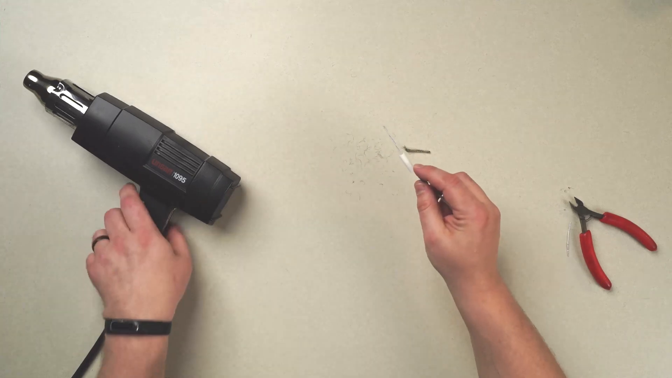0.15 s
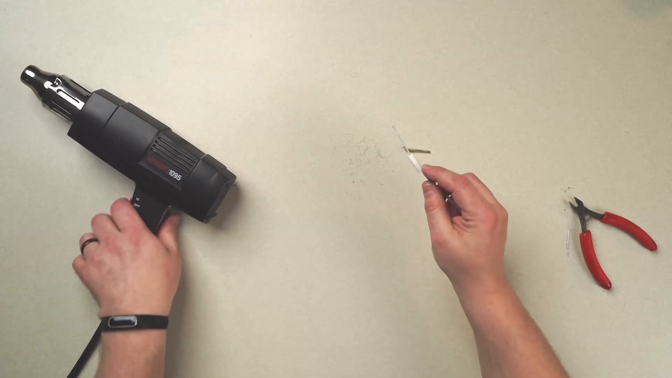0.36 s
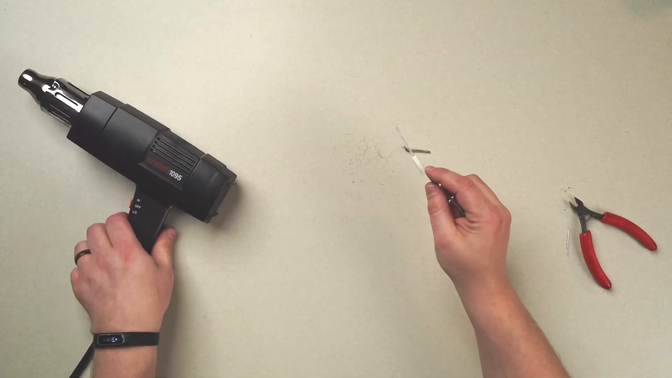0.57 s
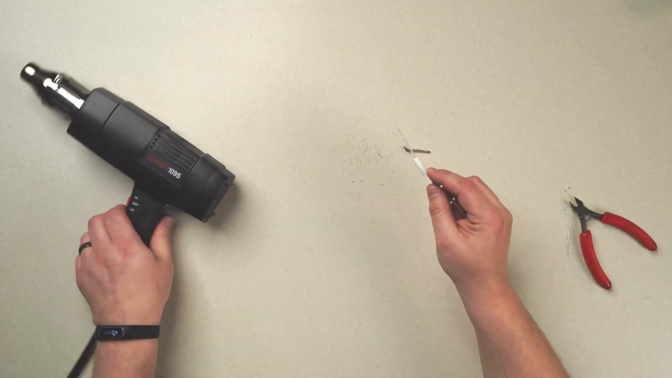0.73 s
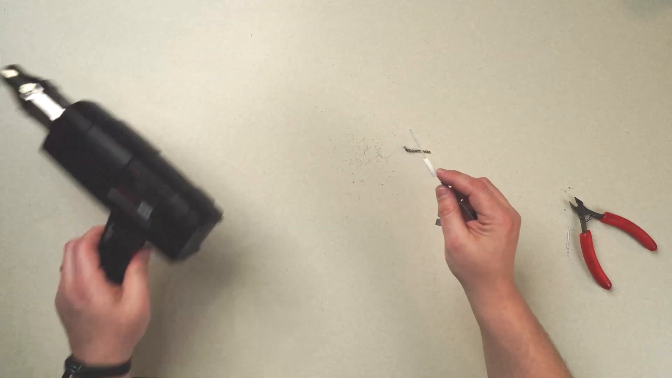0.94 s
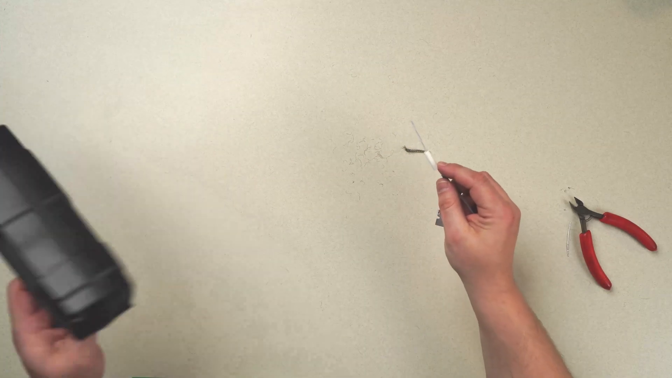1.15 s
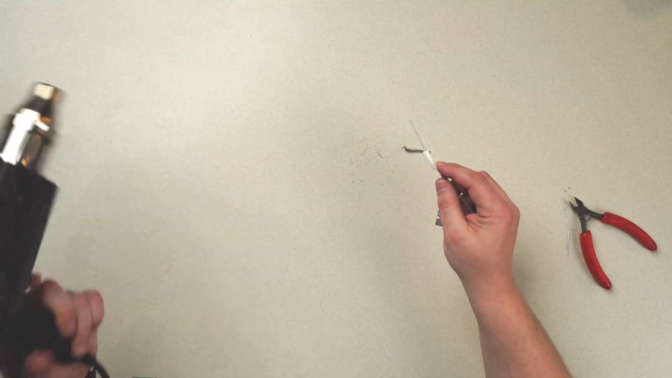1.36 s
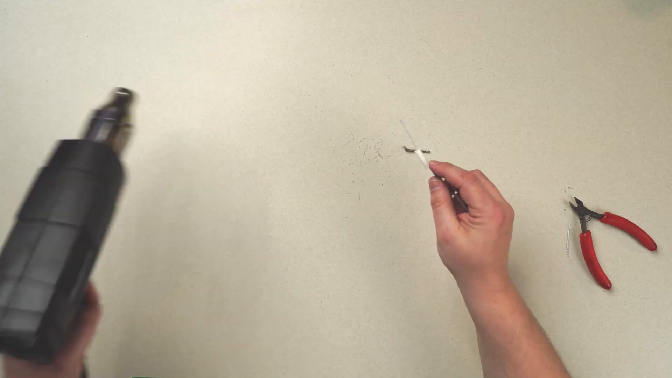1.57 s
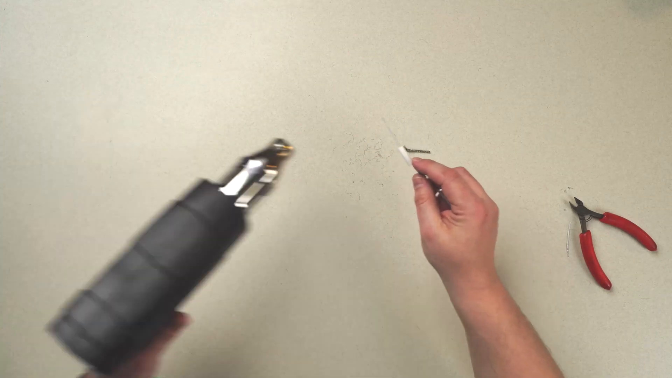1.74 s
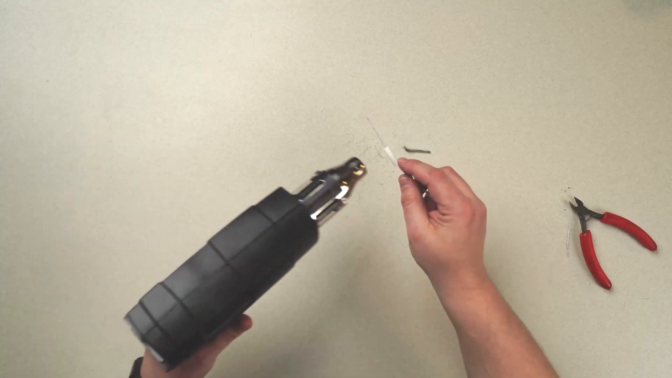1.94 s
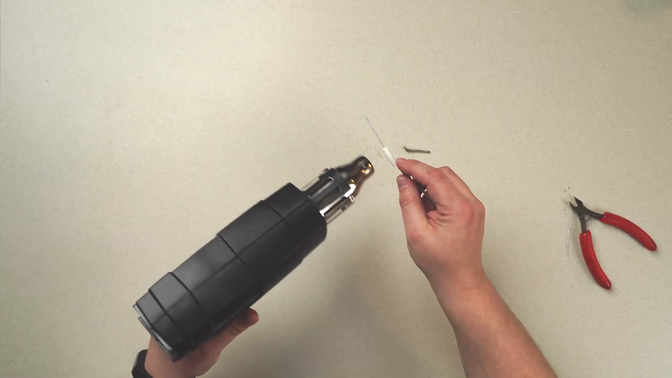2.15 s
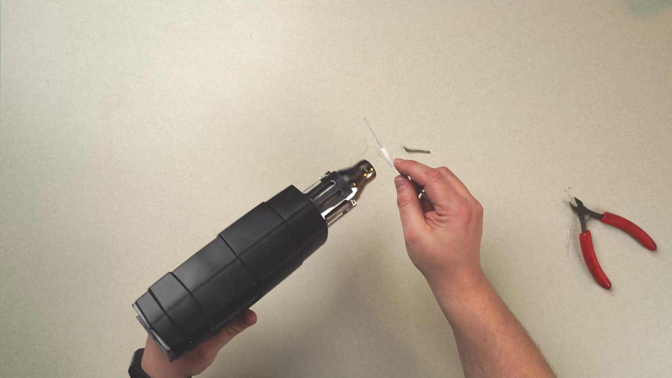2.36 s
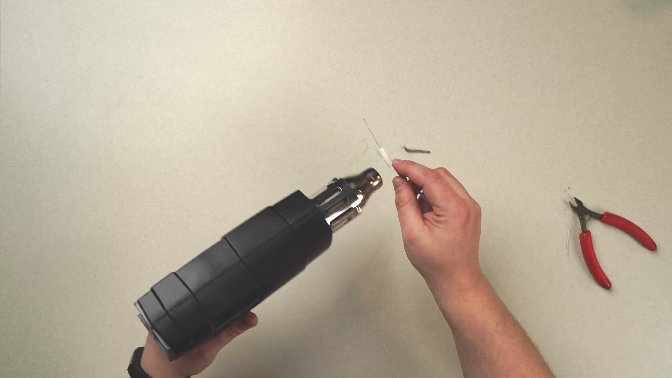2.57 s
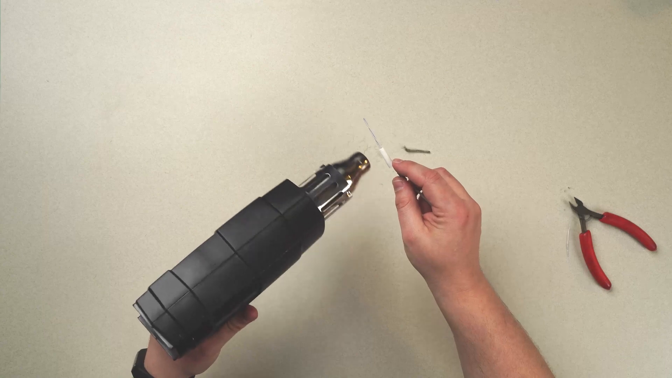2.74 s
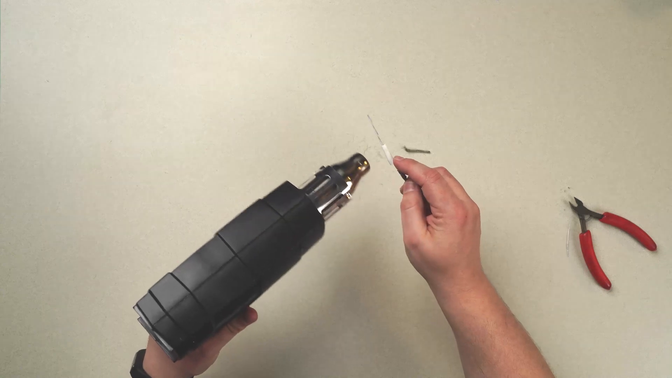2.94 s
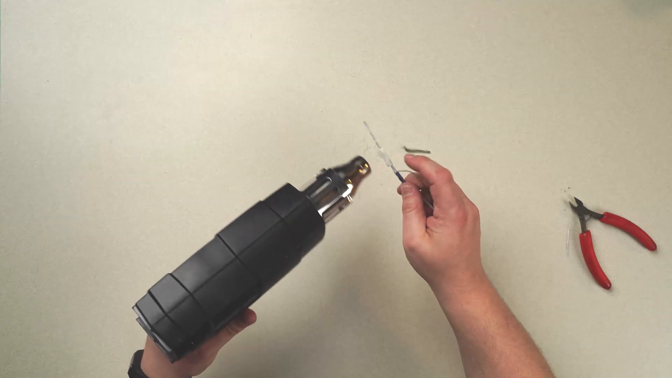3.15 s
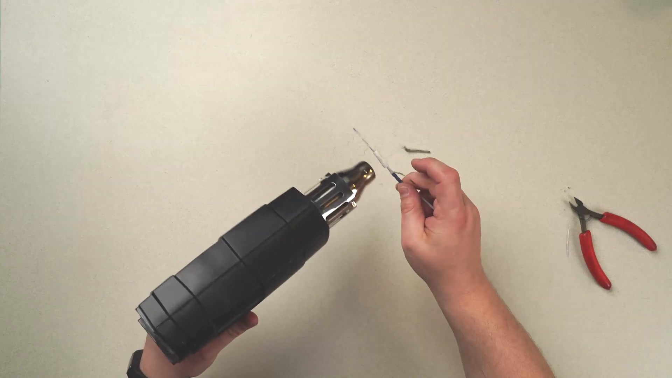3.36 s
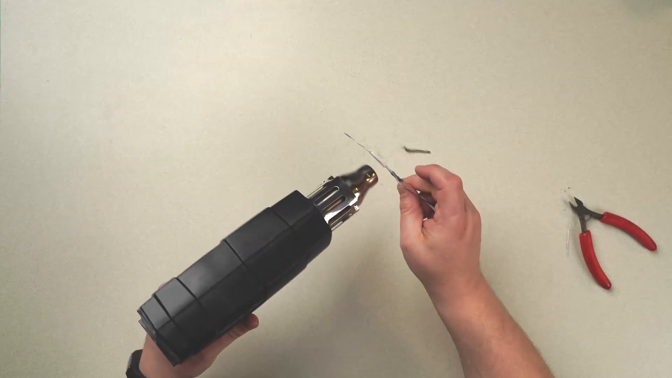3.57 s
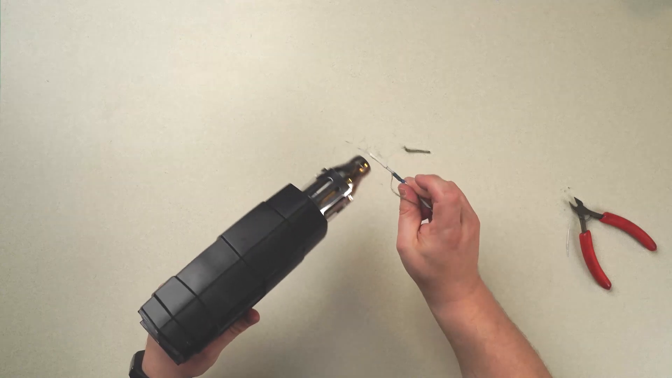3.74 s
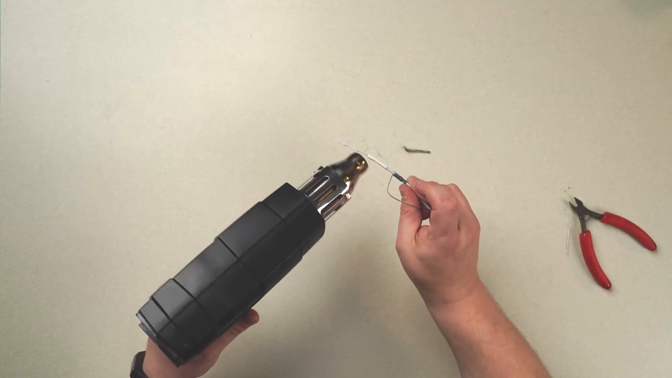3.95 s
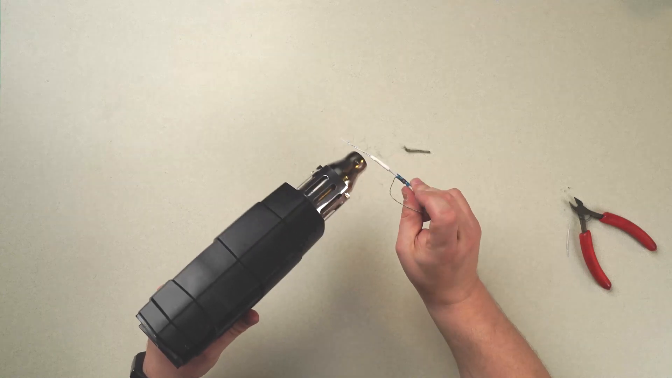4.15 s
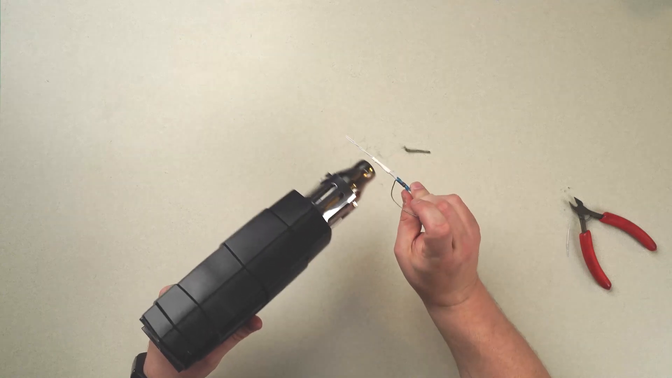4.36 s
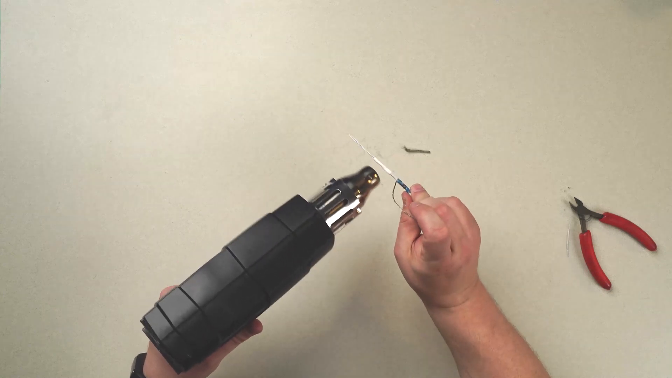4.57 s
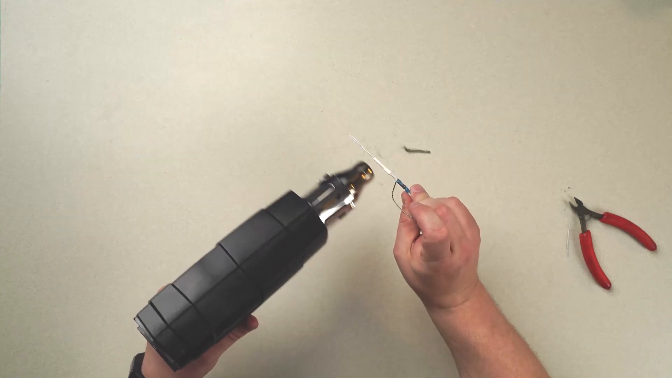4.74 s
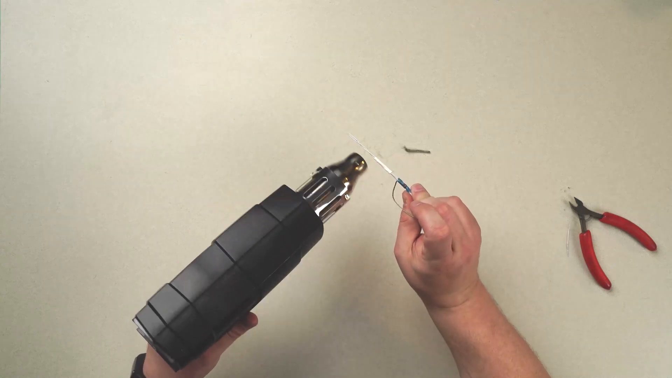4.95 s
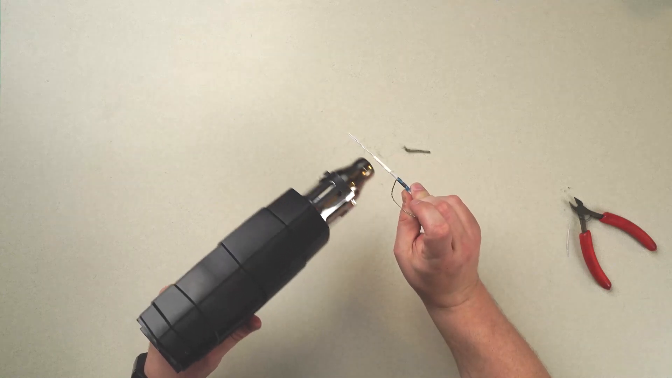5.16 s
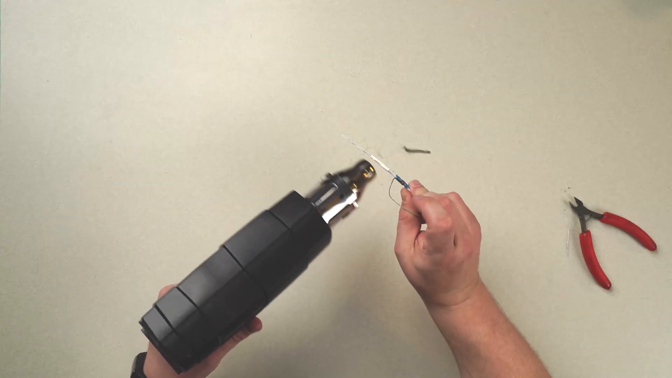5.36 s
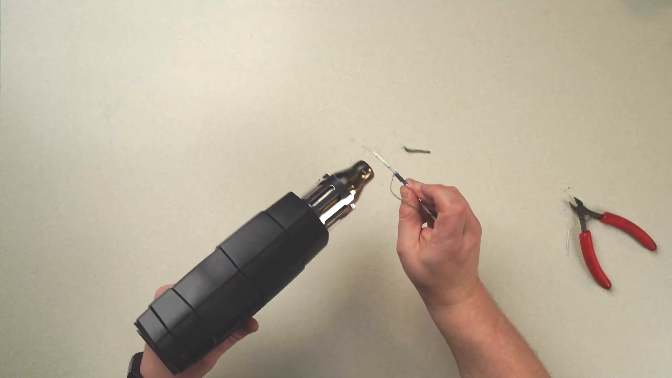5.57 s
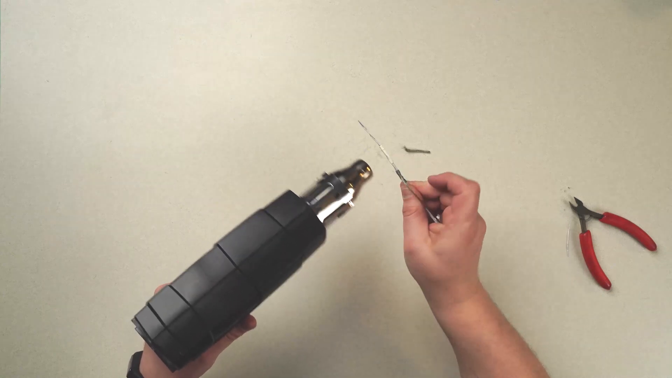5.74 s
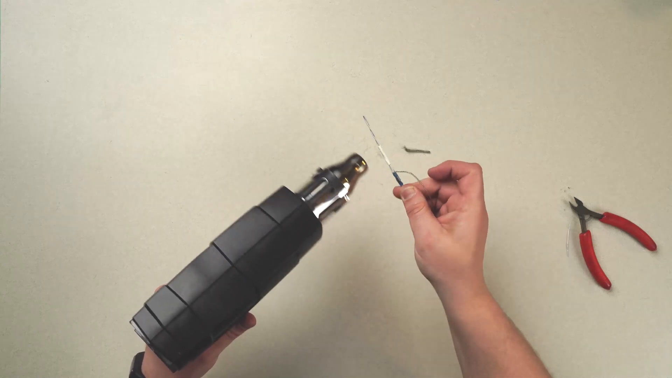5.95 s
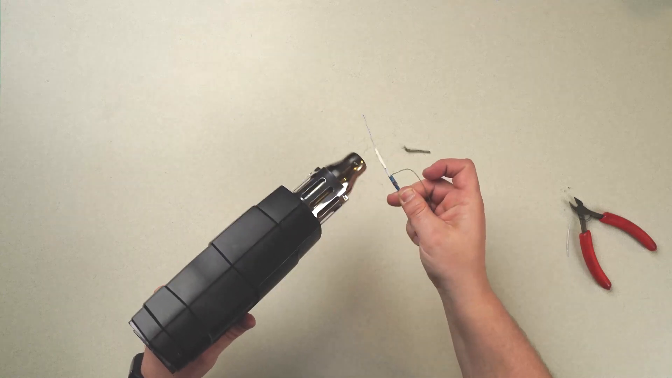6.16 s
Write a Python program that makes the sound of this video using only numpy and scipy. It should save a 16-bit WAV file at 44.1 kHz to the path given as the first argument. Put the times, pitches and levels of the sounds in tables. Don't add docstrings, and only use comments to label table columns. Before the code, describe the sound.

A heat gun is handled with plastic ticks and soft bench bumps, its switch snaps, and the motor climbs to a steady whine with rushing air.

```python
import sys
import numpy as np
from scipy import signal
from scipy.fft import rfft, irfft
from scipy.io import wavfile
from scipy.ndimage import uniform_filter1d, map_coordinates

SR = 44100
rng = np.random.default_rng(int(sys.argv[2]) if len(sys.argv) > 2 else 0)


def unload_wav(signal):
    wavfile.write(
        sys.argv[1],
        SR,
        np.round(np.clip(np.atleast_2d(signal).T, -1, 1) * 32767).astype(np.int16),
    )


def makeup_ratio(level_db):
    decades = np.asarray(level_db, float) / 20
    return 10 ** decades


N = 273861
TIME = np.arange(N) / SR
HZ = np.arange(N // 2 + 1) * SR / N + 1e-3

# f/Hz, level/dB per Hz
ROOM_NOISE = [(26, -32), (45, -12), (108, 5.5), (171, 4), (355, -0.5), (873, -14), (1320, -15), (1770, -23),
              (7060, -29), (12700, -25), (15000, -42)]
# middle t/s, length t/s, level/dB
PUFFS = [
    (.02, .25, -76),
    (1.6, .09, -61),
    (1.74, .16, -57),
    (1.92, .07, -54),
    (2.17, .22, -62),
    (2.8, .5, -70),
]
# t/s, shell ring level/dB, struck part level/dB, struck part f/Hz, bright crack level/dB
GRIP_TICKS = [(.005, -84, -67, 13500, -78), (.151, -64, -64, 3600, -65), (.157, -61, -65, 4000, -62),
              (.216, -60, -67, 3000, -73), (.233, -67, -68, 4000, -79), (0.353, -52, -55, 1500, -75),
              (.357, -48, -46, 600, -62), (.361, -47, -49.5, 4160, -70), (.5, -53, -75, 2500, -84),
              (.521, -53, -70, 3300, -86), (0.676, -85, -54, 2450, -95)]
LIFT_TICKS = [(.758, -45, -41.5, 2020, -38), (.76, -38, -33, 3980, -54), (0.845, -38.5, -55, 4500, -58),
              (.848, -48, -56, 4500, -55), (0.858, -55, -55, 3600, -55), (.869, -38, -40, 5400, -46),
              (.872, -55, -46, 3500, -55), (0.878, -45, -43, 4600, -56), (.906, -66, -70, 5500, -65),
              (.944, -57, -62, 3000, -68), (1.051, -74, -63, 3800, -63), (1.059, -69, -59, 3850, -55)]
SWITCH_TICKS = [
    (1.123, -62, -55, 2900, -64),
    (1.127, -49, -46, 2900, -55),
    (1.131, -60, -44, 4770, -51),
    (1.132, -70, -42, 13000, -70),
    (1.142, -38, -34, 3540, -46),
    (1.145, -46, -46, 3000, -59),
    (1.151, -41, -40.5, 950, -64),
    (1.233, -45, -68, 3000, -80),
]
TICK_T60_S = (0.018, 0.019, 0.026)
# f/Hz, width f/Hz, level/dB
TICK_RINGS = [
    [(646, 120, 1), (940, 210, -13), (1100, 380, 16), (1600, 150, -4)],
    [(6430, 930, 3), (8000, 1400, -1), (10300, 2500, 5), (13000, 1700, -7)],
]
# middle t/s, length t/s, level/dB, bright rub against it level/dB
STROKES = [
    (.12, .05, -74, -8),
    (.18, 0.061, -84, 6),
    (0.242, 0.055, -65, -26),
    (0.353, 0.064, -59.5, -13),
    (.42, 0.12, -64, -14),
    (0.585, .1, -58.5, -15.5),
    (0.804, 0.065, -59.5, -12),
    (0.89, 0.14, -66, -3),
    (1.023, 0.16, -70, -5),
    (1.2, .14, -67, 0),
]
# t/s, peak level/dB, f/Hz,
# time to fall 60 dB t/s
BUMPS = [(.22, -65, 170, 0.036), (.312, -51.5, 190, .05), (0.323, -50, 190, 0.04), (0.494, -42, 157, 0.031),
         (0.521, -49, 152, 0.064), (.564, -40.5, 157, 0.033), (.6, -54, 170, .05), (.62, -46, 170, 0.037),
         (0.687, -52, 130, 0.044), (0.789, -49, 145, 0.064), (.803, -56, 145, 0.065),
         (0.837, -53, 150, 0.044), (1.54, -57, 105, 0.18), (1.6, -59, 125, .1)]
# full-speed level/dB, power of speed, turned-away level/dB, drift level/dB per s
FLOW = [
    (-34, 1.53, -3.5, .15),
    (-38, 2.3, -3, -.3),
    (-36, 3.36, -4.5, -0.03),
]
# f/Hz, level/dB per Hz
AIR_COLOUR = [(90, -36.5), (200, -14.5), (330, -8), (520, -1), (900, -2.5), (1500, -7), (1950, -16),
              (3000, -8), (5300, -18), (7500, -13), (9800, -18.5), (12000, -17.5), (14500, -18)]
# f/Hz, level/dB per Hz
AWAY_COLOUR = [(90, -25), (330, -9.5), (900, 0), (1900, -14), (2800, -5), (4500, -13), (7000, -7),
               (7900, -22), (9000, -15), (11500, -13), (12300, -16), (14000, -18), (15000, -36)]
# f/Hz, width f/Hz, level/dB per Hz
BARREL = [(513, 140, -3), (696, 35, -1.5), (968, 74, 1), (1125, 43, 2.5), (1530, 100, -8.5),
          (2633, 290, -4.5), (2741, 36, 0), (3270, 170, -7.5), (4243, 205, -5), (4736, 170, -7),
          (5110, 60, -8.5), (5790, 250, -6.5), (6000, 220, -4.5), (6810, 120, -10), (7220, 100, -17),
          (8130, 190, -11), (8900, 120, -12), (9030, 420, -16), (10460, 170, -12.5), (11430, 300, -10),
          (12160, 340, -17), (13030, 310, -9.5)]
# multiple of the shaft speed, level/dB
BUZZ = [(2, 2), (3, -6), (4, -1.5), (5, -6.5), (6, -12), (7, -9), (8, -2), (9, -11), (10, -13), (11, -31),
        (16, -10)]
# multiple of the shaft speed, level/dB
RIPPLE = [(2, -4.5), (3, -2), (4, -0.5), (5, 1.7), (6, -3), (7, -9), (8, -5), (9, -7), (10, -19), (11, -8),
          (12, -17), (13, -14), (14, -16), (15, -19), (16, -14), (17, -15), (18, -17), (19, -16), (20, -14),
          (22, -14)]
# shaft f/Hz, width f/Hz, gain level/dB
WOBBLE = [(160, 18, 4.5), (179, 12, 3), (193, 14, 10), (252, 22, 4.5), (272, 16, 3), (318, 29, 2),
          (333, 20, -2), (376, 41, 1.5)]
# f/Hz, width f/Hz, level/dB
GRIP = [(194, 27, -55.5), (284, 18, -47), (340, 21, -43)]
# f/Hz, width f/Hz, turned-away level/dB, aimed level/dB
SHELL = [(724, 73, -18, 5), (855, 31, 3, -18), (950, 67, -1, 4), (1109, 47, 4.5, 5), (1234, 93, -1, -30),
         (1332, 63, 2.5, -7), (1500, 33, -27, 3.5), (1590, 57, -20, -1), (1720, 60, -3, -21),
         (1840, 100, -15, -3.5)]
SLOTS = [(2200, 100, -4, -12), (2450, 110, -3, -8), (2650, 90, -1.5, -2.5), (2800, 90, 4, -3),
         (2980, 90, 3, -6), (3180, 80, -5, -7), (3450, 90, -1.5, -8), (3780, 110, -2.5, -8)]
# shaft f/Hz, width f/Hz, low rattle level/dB, bright rattle level/dB
SHAKE = [(92, 34, -58, -84), (139, 48, -56, -67), (161, 12, -54, -76), (202, 17, -43, -51),
         (204, 20, -46, -66), (280, 22, -50, -67), (308, 21, -41.5, -72), (345, 42, -55, -80)]

SWITCH_S = 1.132
FULL_HZ = 429.07


def slope(points):
    hz, db = np.transpose(points)
    return makeup_ratio(np.interp(np.log(HZ), np.log(hz), db)) ** 2


def peaks(modes, hz):
    return sum(makeup_ratio(db) ** 2 / (1 + (1.41 * (hz - f) / w) ** 2) ** 2 for f, w, db in modes)


def band(lo_hz, hi_hz):
    return 1 / (1 + (lo_hz / HZ) ** 8) / (1 + (HZ / hi_hz) ** 8)


def noise(power):
    hiss = irfft(rfft(rng.standard_normal(N)) * np.sqrt(power), N)
    return hiss / np.sqrt(np.mean(hiss ** 2))


def walk(rate):
    k = int(SR / rate)
    held = np.repeat(rng.standard_normal(N // k + 1), k)
    return 1.26 * uniform_filter1d(uniform_filter1d(held, k), k)[:N]


def swells(rows, rest_db):
    power = makeup_ratio(rest_db) ** 2
    for s, length, db in rows:
        power = power + makeup_ratio(db) ** 2 * np.exp(-(2.56 * (TIME - s) / length) ** 2)
    return np.sqrt(power)


def ring(modes, t):
    out = 0
    for f, w, db in modes:
        swell_and_fade = w * t * np.exp(-1.8 * np.pi * w * t)
        out = out + makeup_ratio(db) * np.sqrt(w) * swell_and_fade * np.sin(2 * np.pi * f * t)
    return out / np.sqrt(np.sum(out ** 2))


def room():
    floor = makeup_ratio(-67 + 2.7 * walk(3.3)) * noise(slope(ROOM_NOISE) * band(40, 12500))
    hum = makeup_ratio(-70 + 3.3 * walk(2.9)) * np.sin(2 * np.pi * 59 * TIME)
    draught = swells(PUFFS, -73.5) * makeup_ratio(4.3 * walk(11)) * noise(band(8.8, 43))
    return floor + hum + draught


def ticks():
    out, t = np.zeros(N), TIME[:SR // 8]
    shell, crack = (ring(modes, t) for modes in TICK_RINGS)
    for rows, t60 in zip((GRIP_TICKS, LIFT_TICKS, SWITCH_TICKS), TICK_T60_S):
        fade = makeup_ratio(-60 * t / t60)
        for s, shell_db, part_db, hz, crack_db in rows:
            part = ring([(hz, 640, 0), (.82 * hz, 500, -11), (1.33 * hz, 900, -13)], t)
            i = int(s * SR)
            for db, rings in ((shell_db, shell), (part_db, part), (crack_db, crack)):
                burst = (rng.standard_normal(len(t)) + 3 * (t == 0)) * fade
                out[i:i + len(t)] += makeup_ratio(db) * signal.fftconvolve(burst, rings)[:len(t)]
    return signal.sosfilt(signal.butter(4, 450, "high", fs=SR, output="sos"), out)


def echo(hits):
    t60_s, level_db = 0.13, -14.5
    t = TIME[:SR // 3]
    tail = noise(slope([(200, -10), (1000, 1.5), (5000, -7), (15000, -10)]))[:len(t)]
    tail = tail * makeup_ratio(-60 * t / t60_s) * (t > .004)
    tail = tail / np.sqrt(np.sum(tail ** 2))
    return makeup_ratio(level_db) * signal.fftconvolve(hits, tail)[:N]


def rubbing():
    dull_gain = swells([(s, length, db) for s, length, db, _ in STROKES], -75.5)
    bright_gain = swells([(s, length, db + rel_db) for s, length, db, rel_db in STROKES], -96)
    dull_colour = slope([(200, 4), (500, -2), (1600, -7.5), (2100, -17), (4000, -47)])
    bright_colour = slope([(2100, -12), (3000, -2.5), (4200, -10), (5200, -13), (7000, -16), (13000, -20),
                           (15500, -30)])
    dull = dull_gain * makeup_ratio(2.8 * walk(60.3)) * noise(dull_colour)
    bright = bright_gain * makeup_ratio(2.7 * walk(79.0)) * noise(bright_colour)
    fade_out = np.clip((1.3 - TIME) / 0.14, 0, 1)
    return fade_out * (dull + bright)


def bumps():
    out, t = np.zeros(N), TIME[:SR // 5]
    soft_start = 1 - np.exp(-t / 0.0045)
    for s, db, hz, t60 in BUMPS:
        i = int(s * SR)
        out[i:i + len(t)] += 3 * makeup_ratio(db - 60 * t / t60) * soft_start * np.sin(2 * np.pi * hz * t)
    return out


def run_up():
    drag_hz, time_s = 548.8, .2786
    left = np.exp(-np.clip(TIME - SWITCH_S, 1e-4, None) / time_s)
    return (1 - left) / (1 + FULL_HZ / drag_hz * left)


def aim():
    start_s, length_s = 1.473, 0.42
    return np.clip((TIME - start_s) / length_s, 0, 1)


def motor(share, hz):
    phase = 2 * np.pi * np.cumsum(hz + 0.3764 * walk(12)) / SR
    tires_db = -0.7 * np.clip(TIME - 4.06, 0, None)
    tone_gain = np.sqrt((makeup_ratio(-33 + tires_db) * share ** 5.2) ** 2 + peaks(GRIP, hz))
    out = np.sqrt(2) * tone_gain * makeup_ratio(.5 * walk(10)) * np.sin(phase)
    for k, db in BUZZ:
        gain = share ** 3.6 * makeup_ratio(-43 + db + tires_db + 1.25 * walk(11))
        out += gain * np.sin(k * phase + 6 * rng.random())
    early = slice(SR, 3 * SR)
    return_gain = makeup_ratio(1.2 * walk(60)) * share ** 2.42 * (1 - share) ** 0.58
    strain = return_gain[early] * np.sqrt(makeup_ratio(-6) ** 2 + peaks(WOBBLE, hz[early]))
    coarse = slice(SR, 3 * SR, 32)
    aimed = aim()[coarse]
    for k, db in RIPPLE:
        shell = 0
        for f, w, away_db, aimed_db in SHELL + SLOTS:
            turn_db = away_db + (aimed_db - away_db) * aimed
            shell = shell + peaks([(f, w, 0)], k * hz[coarse]) * makeup_ratio(turn_db) ** 2
        shell = np.interp(TIME[early], TIME[coarse], shell)
        gain = np.sqrt(2 * shell) * makeup_ratio(-28 + db) * strain
        out[early] += gain * np.sin(k * phase[early] + 6 * rng.random())
    return out


def warming(x):
    share, from_s, time_s = .055, 1.6, .4
    late_s = share * time_s * np.exp(-np.clip(TIME - from_s, -.3, None) / time_s)
    return map_coordinates(x, [(TIME + late_s) * SR], order=5, mode="mirror")


def air(share):
    aimed = aim()
    low_db, mid_db, high_db = (db + 20 * power * np.log10(share) + away_db * (1 - aimed) + drift_db * (TIME - 3)
                               for db, power, away_db, drift_db in FLOW)
    shade = slope([(12900, 0), (13750, -9), (14800, -11.5), (15650, -6.5)])
    colour = (slope(AIR_COLOUR) + peaks(BARREL, HZ)) * shade
    away_colour = slope(AWAY_COLOUR)
    out = 0
    for db, part, warms in ((low_db, band(1, 1930), False), (mid_db, band(1800, 4060), False),
                            (high_db - 1.5, band(4770, 10000), False),
                            (high_db - 5.0, band(11100, 30000), True)):
        jet = noise(colour * part)
        if warms:
            jet = warming(jet)
        flow = np.sqrt(aimed) * jet + np.sqrt(1 - aimed) * noise(away_colour * part)
        out = out + makeup_ratio(db + 0.14 * walk(3.04) + 0.52 * walk(25.07)) * flow
    return out


def rattle(hz):
    low_gain = np.sqrt(peaks([(f, w, db) for f, w, db, _ in SHAKE], hz))
    bright_gain = np.sqrt(peaks([(f, w, db) for f, w, _, db in SHAKE], hz))
    low_colour = peaks([(760, 98, -8), (940, 98, -3), (1120, 48, 5.0), (1290, 110, -12)], HZ)
    bright_colour = peaks([(3000, 1300, 6), (6000, 900, -8.5), (11600, 900, -1), (13800, 900, -3)], HZ)
    low = low_gain * makeup_ratio(3.2 * walk(70)) * noise(low_colour)
    bright = bright_gain * makeup_ratio(2.1 * walk(88.8)) * noise(bright_colour)
    return low + bright


def scene():
    share = run_up()
    sag_hz = 2.387 * np.clip(TIME - SWITCH_S, 0, None)
    hz = FULL_HZ * share - sag_hz
    hits = ticks()
    handling = hits + echo(hits) + rubbing() + bumps()
    gun = (TIME > SWITCH_S) * (motor(share, hz) + air(share) + rattle(hz))
    mono = room() + handling + gun
    return np.array([mono, mono])


def roll_off(x):
    return signal.sosfilt(signal.butter(12, 16580, fs=SR, output="sos"), x)


def record(dry):
    cut = signal.ellip(12, .5, 70, 15730, fs=SR, output="sos")
    mix = signal.sosfilt(cut, dry)
    return roll_off(mix)


dry = scene()
out = record(dry)
unload_wav(out)
```